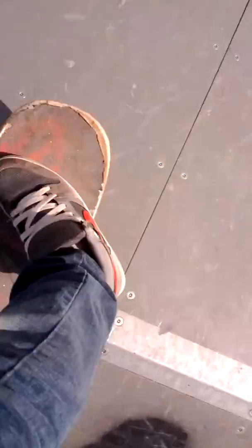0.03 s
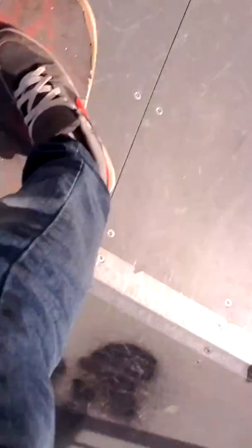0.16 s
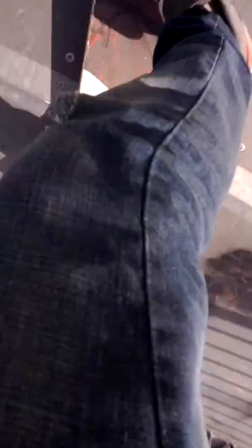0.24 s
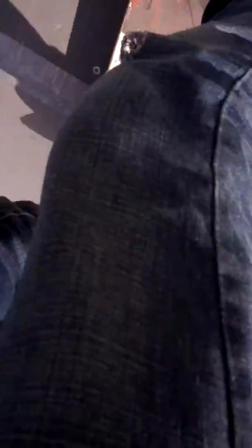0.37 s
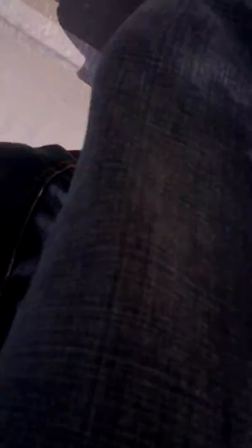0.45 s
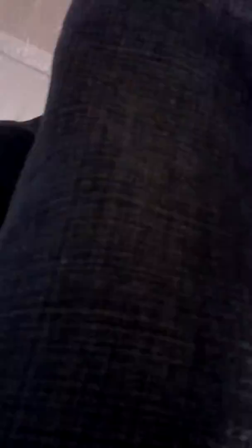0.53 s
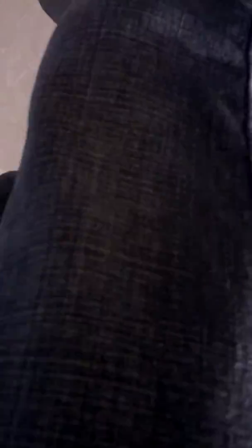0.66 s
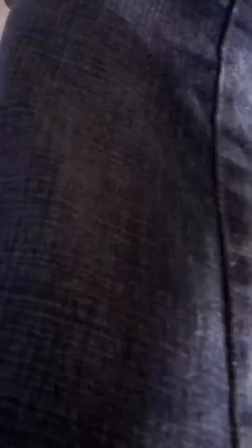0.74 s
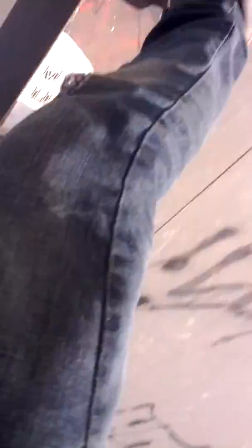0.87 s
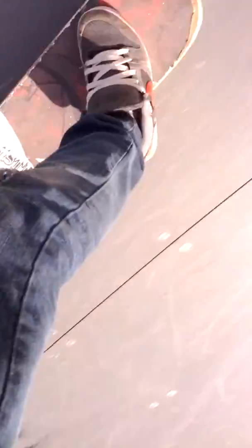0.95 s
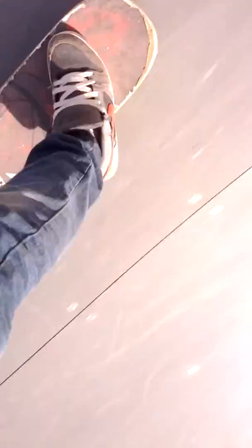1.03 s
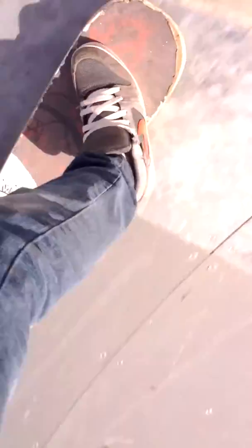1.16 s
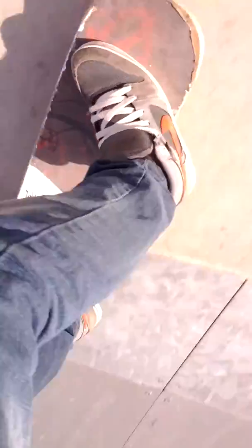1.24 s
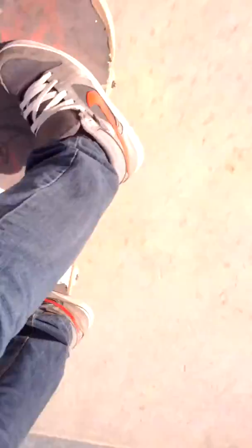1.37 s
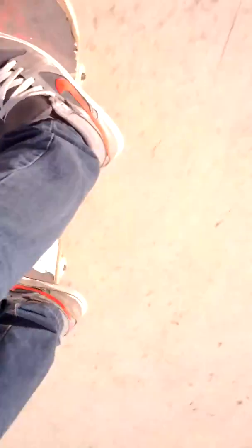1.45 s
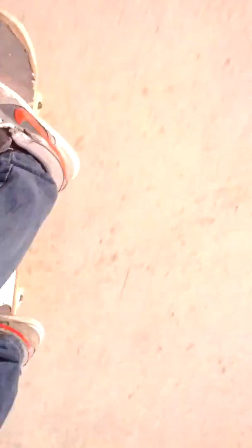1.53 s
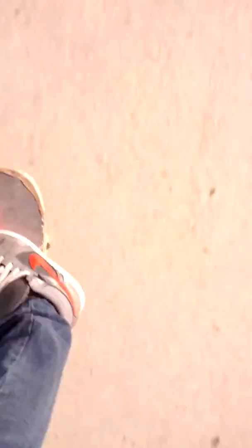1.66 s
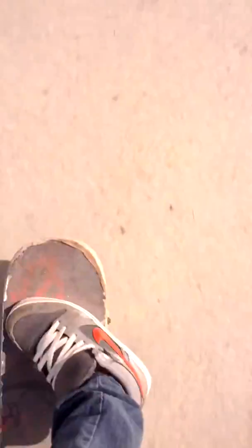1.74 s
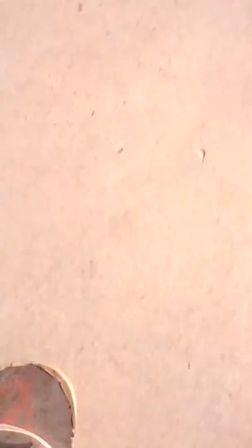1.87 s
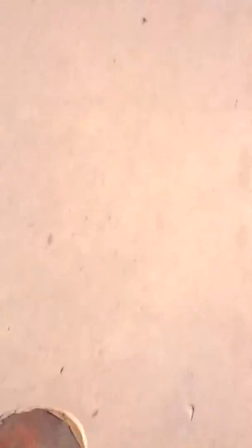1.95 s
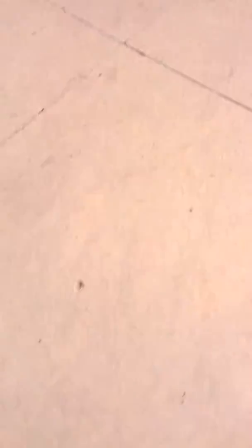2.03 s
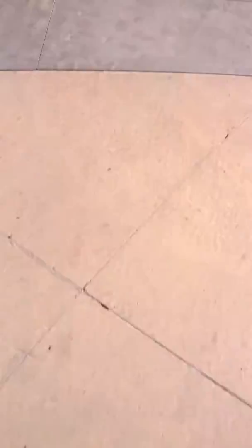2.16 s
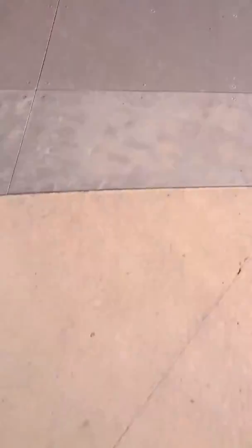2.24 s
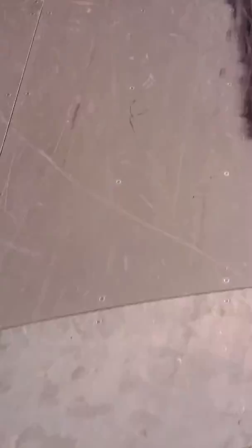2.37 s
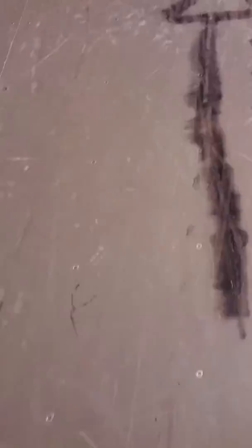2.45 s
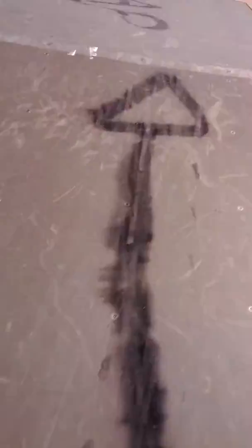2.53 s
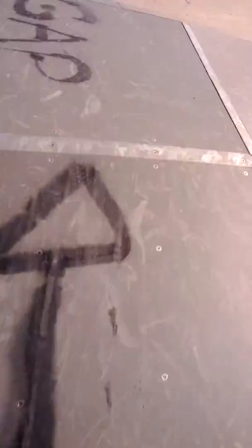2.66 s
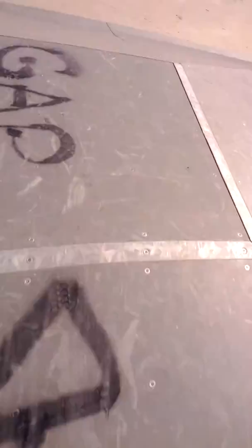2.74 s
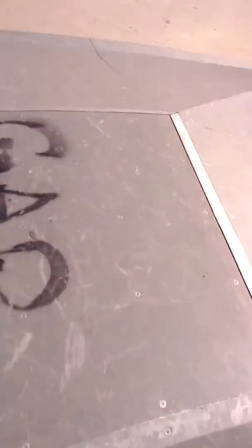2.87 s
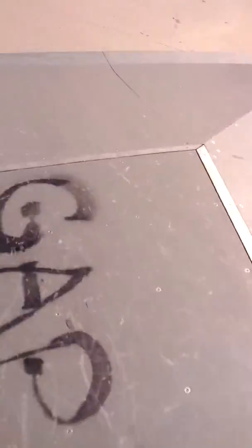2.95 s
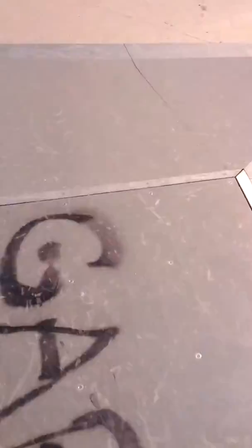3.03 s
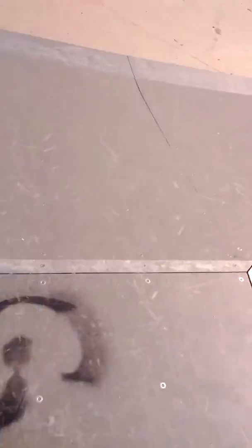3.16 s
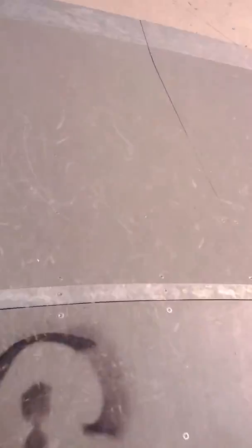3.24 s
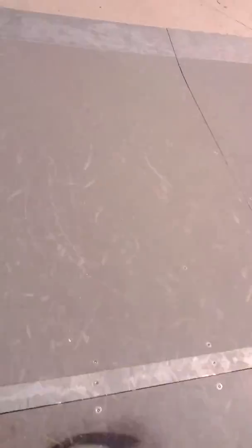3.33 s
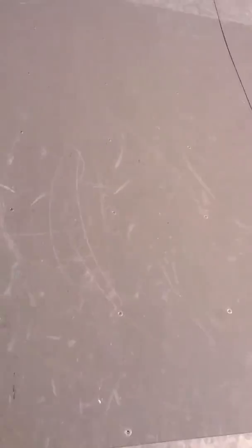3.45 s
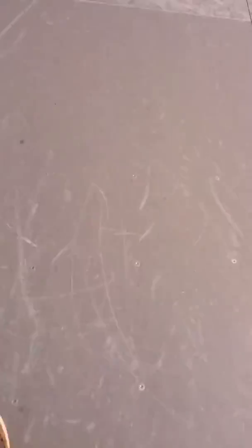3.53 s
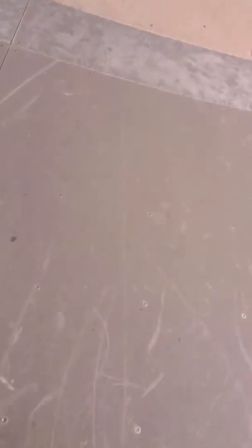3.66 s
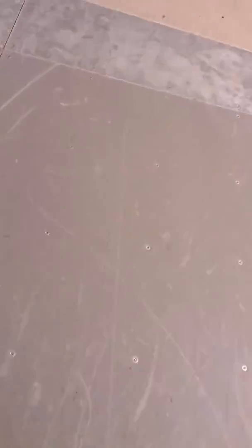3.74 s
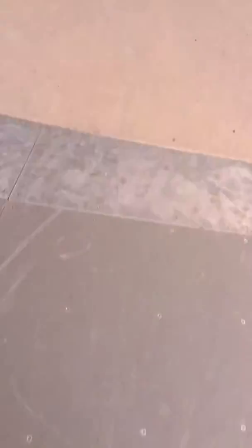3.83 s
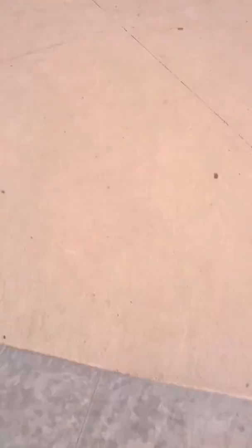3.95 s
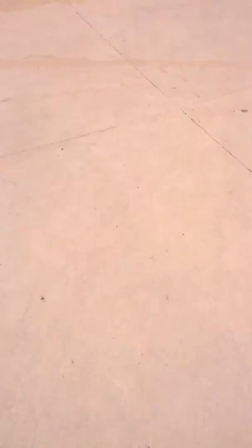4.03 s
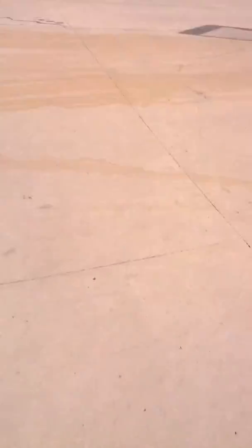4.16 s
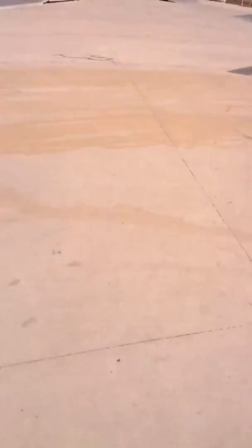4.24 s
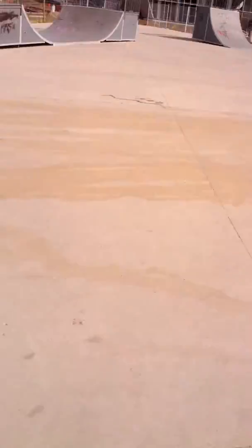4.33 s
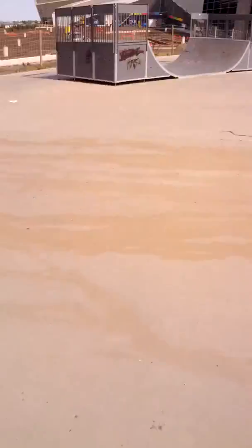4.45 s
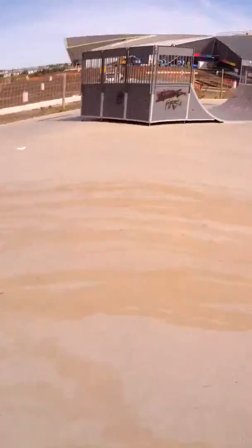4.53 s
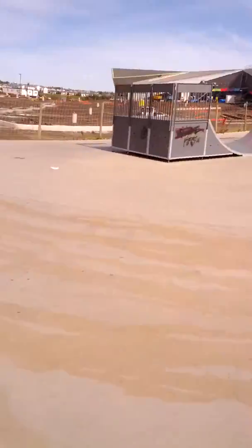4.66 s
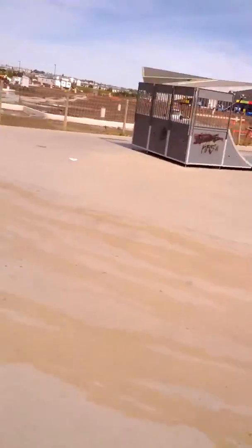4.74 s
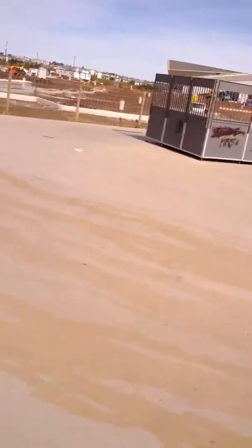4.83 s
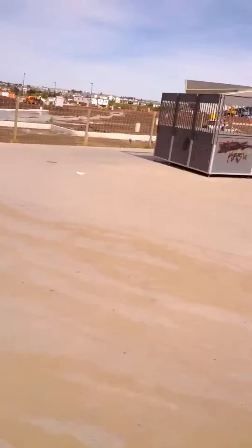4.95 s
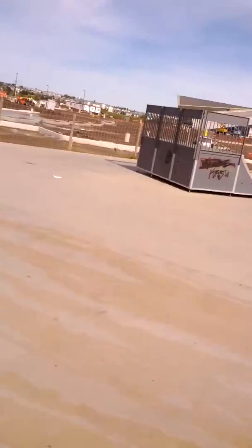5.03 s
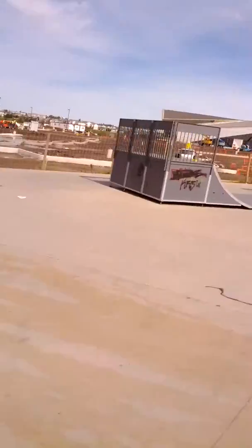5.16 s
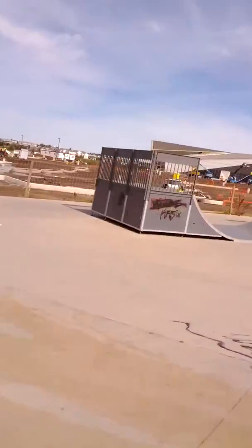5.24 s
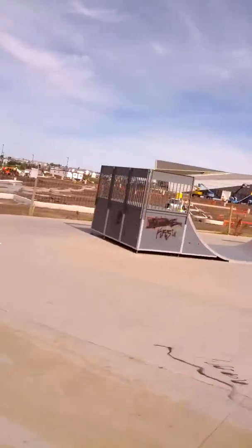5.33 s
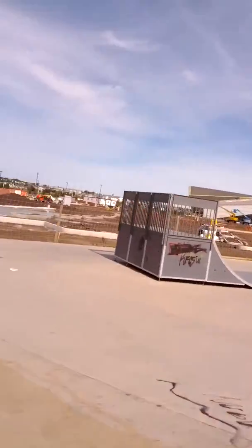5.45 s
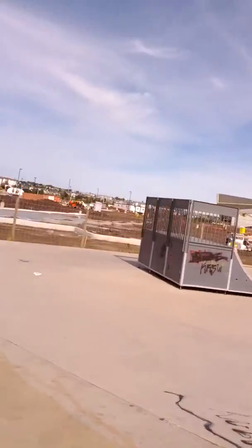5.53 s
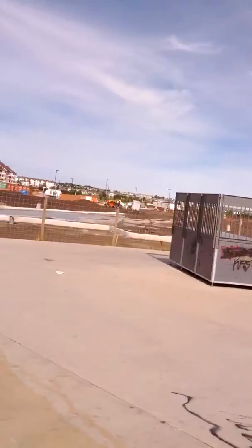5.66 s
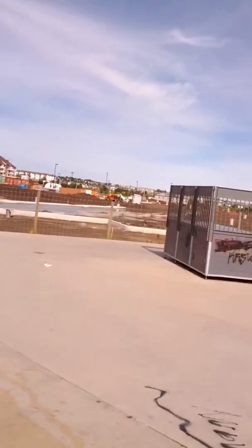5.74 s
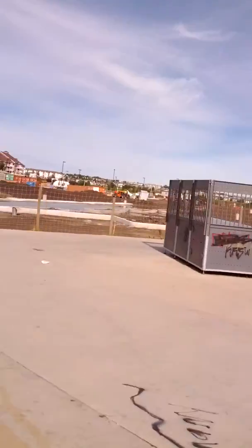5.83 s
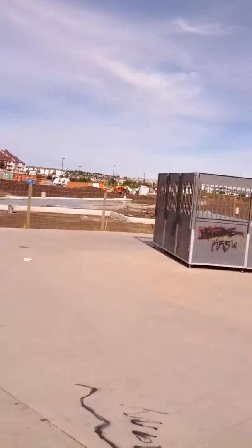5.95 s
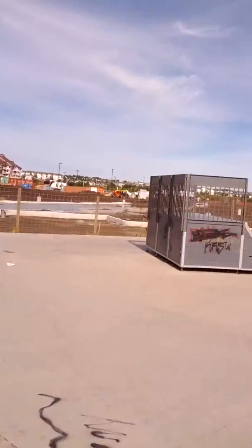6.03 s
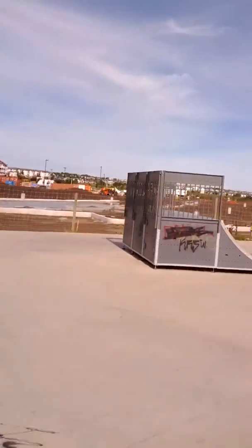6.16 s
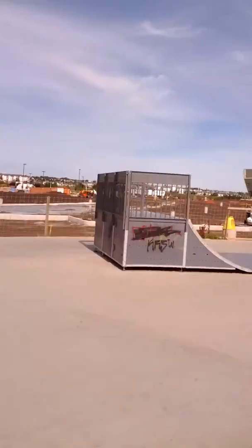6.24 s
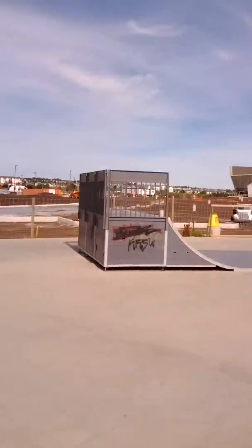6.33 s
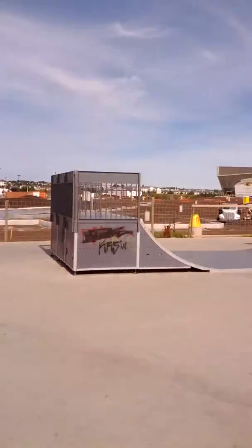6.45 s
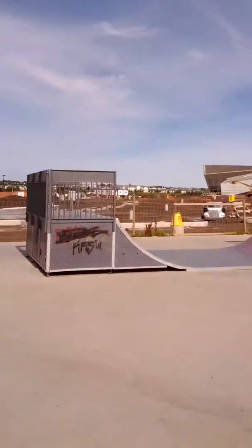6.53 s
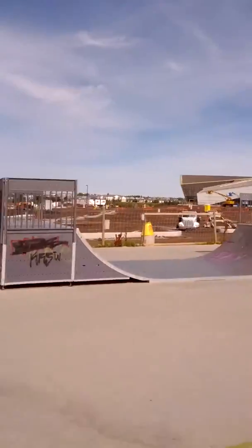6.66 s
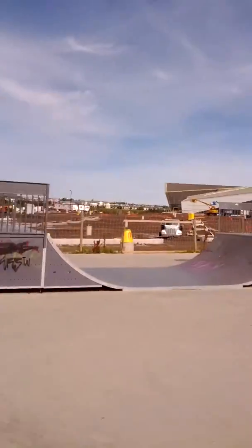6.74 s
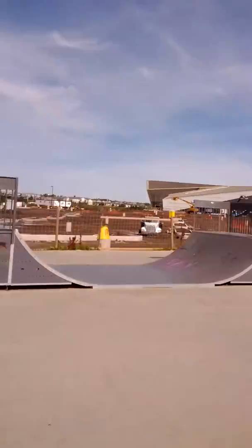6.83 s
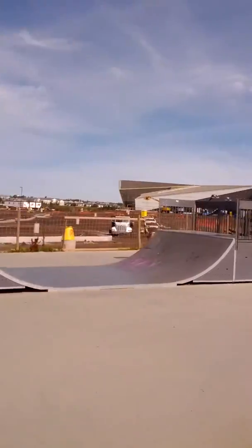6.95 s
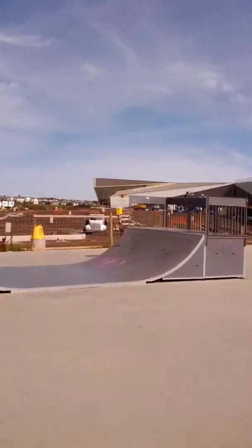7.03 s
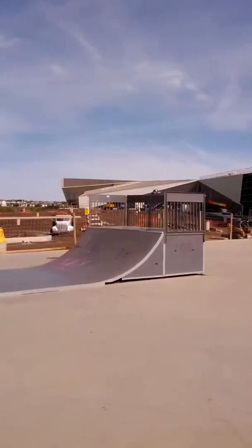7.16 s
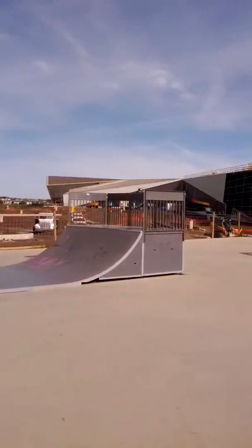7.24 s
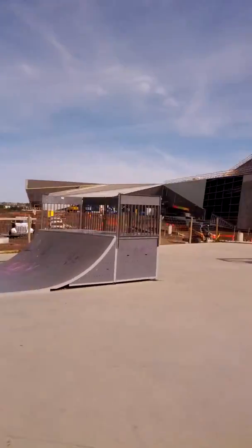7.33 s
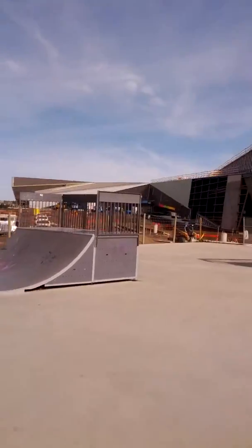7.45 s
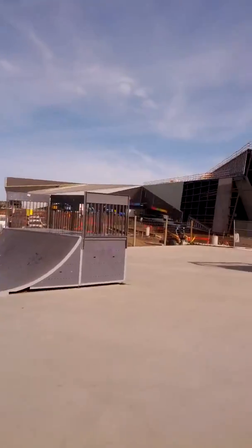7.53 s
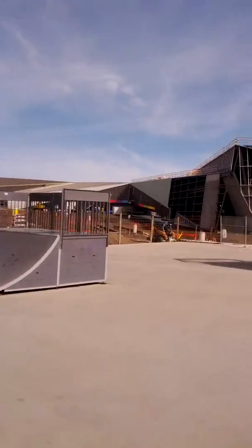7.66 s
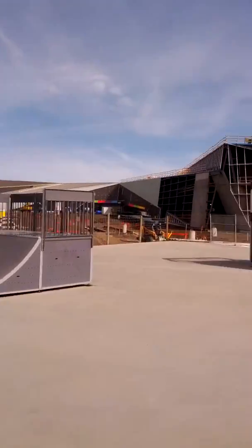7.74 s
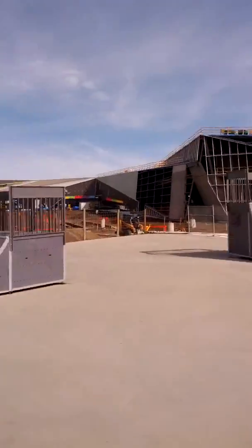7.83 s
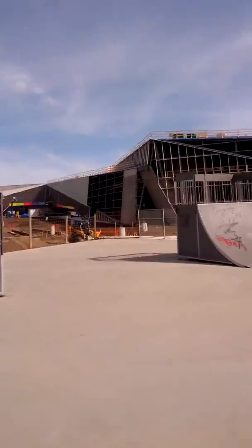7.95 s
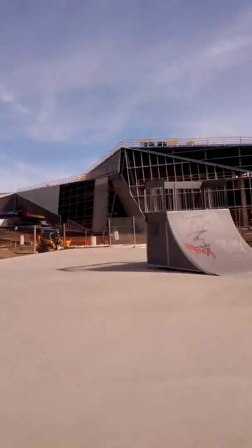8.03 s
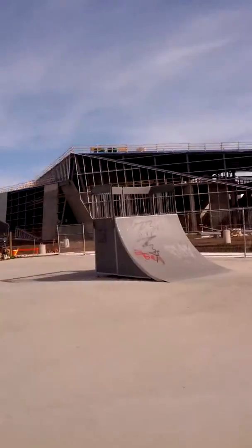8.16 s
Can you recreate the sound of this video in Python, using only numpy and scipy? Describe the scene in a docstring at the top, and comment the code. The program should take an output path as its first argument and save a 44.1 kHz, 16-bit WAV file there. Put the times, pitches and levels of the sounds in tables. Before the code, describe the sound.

A skateboard rolls outdoors, heard close from the rider's hand, with low wind rumble and gusts on the microphone throughout. At about 0.3 seconds the board creaks briefly on a ramp's lip, then its rumble builds as it gathers speed, with dull thumps of air around 0.7 seconds. From 1 to 1.3 seconds the wheels clack hard over edges, metal rattles and hollow panels boom, slightly overloading. Coarse concrete follows, with a fast, growling roll and ticking grit. Around 2.5 seconds the board clacks and booms onto a hollow box, with lighter knocks near 3 and 3.5 seconds as the rolling softens. Another cluster of clacks comes between 4.1 and 4.4 seconds. The board then coasts on smooth concrete with a steady rumble, slowing slightly, crosses one last seam with a double clack at 6.5 seconds and rolls on until about 8 seconds.

```python
"""A skateboard ride heard from the rider's hand, with wind buffeting the microphone throughout.
The board creaks over the lip of a ramp and gathers speed, ground grain shaking wheels and deck.
At the foot the wheels clack over edges, the trucks rattle and the panels boom; the hardest peaks overload.
Coarse concrete follows, with ticking grit and growling ripples, then a hollow box that clacks and booms.
The board coasts away on smooth concrete, over one last seam."""
import sys
import numpy as np
from scipy import signal
from scipy.fft import rfft, irfft, next_fast_len
from scipy.io import wavfile
from scipy.ndimage import uniform_filter1d

SR = 44100
rng = np.random.default_rng(int(sys.argv[2]) if len(sys.argv) > 2 else 0)


def to_wav(s):
    """Save 16-bit WAV."""
    ch = np.atleast_2d(s).T  # columns
    pcm = np.round(np.clip(ch, -1, 1) * 32767)  # PCM
    wavfile.write(sys.argv[1], SR, pcm.astype(np.int16))


N = 361179
TIME_S = np.arange(N) / SR


def amp(db):
    """Decibels to gain."""
    return 10 ** (np.asarray(db) / 20)


def unit(x):
    """Scale to rms 1."""
    return x / np.sqrt(np.mean(x ** 2) + 1e-20)


def curves(rows):
    """Each column of a timed table, per sample."""
    time_s, *columns = np.transpose(rows)
    return [np.interp(TIME_S, time_s, column) for column in columns]


def swell(centre_s, half_s):
    """Gaussian rise and fall of height 1."""
    return np.exp(-((TIME_S - centre_s) / half_s) ** 2)


def add(mix, start_s, sound):
    """Mix a sound in at start_s."""
    part = mix[max(round(start_s * SR), 0):][:len(sound)]
    part += sound[:len(part)]


def bells_db(hz, resonances):
    """Summed lift of bell-shaped peaks and dips."""
    return sum(lift / (1 + (2 * (hz - centre) / width) ** 2) for centre, width, lift in resonances)


def colour(x, spectrum, resonances=()):
    """Filter by a smooth spectrum plus resonances; rms 1."""
    size = next_fast_len(len(x))
    hz = np.fft.rfftfreq(size, 1 / SR)
    freq_hz, level_db = np.transpose(spectrum)
    shape_db = np.interp(np.log(hz + 1), np.log(freq_hz + 1), level_db) + bells_db(hz, resonances)
    return unit(irfft(rfft(x, size) * amp(shape_db), size)[:len(x)])


def noise(samples, spectrum, resonances=()):
    """Coloured noise; rms 1."""
    return colour(rng.standard_normal(samples), spectrum, resonances)


def band(x, low_hz, high_hz):
    """Band-pass; rms 1."""
    return unit(signal.sosfilt(signal.butter(4, [low_hz, high_hz], "band", fs=SR, output="sos"), x))


def flutter(per_s):
    """Smooth random drift; rms 1."""
    return unit(np.interp(TIME_S * per_s, np.arange(N), rng.standard_normal(N)))


def bumps(per_s, spread_db):
    """Sparse pushes of uneven size and either sign; rms 1."""
    size = amp(spread_db * np.minimum(rng.exponential(1, N), 4))
    return unit(size * rng.standard_normal(N) * (rng.random(N) < per_s / SR))


# board speed: time_s, speed_m_per_s
SPEED = [(0, 0.67), (.2, 0.8), (.34, 1.23), (.48, 2.2), (.7, 3.03), (1.0, 4.63), (1.25, 5.7), (1.65, 6.43),
         (2.45, 4.93), (2.85, 3.8), (3.2, 3.2), (3.7, 3.13), (4.2, 3.74), (4.75, 3.64), (6.5, 3.24),
         (8.19, 2.8)]
# ramp, coarse flat, box, smooth flat; levels at cruising speed, rises per doubling of speed:
# start_s, drone_db, roar_db, hiss_db, drone_rise_db, roar_rise_db, hiss_rise_db
STRETCHES = [(0, -27, -29, -39, 8.5, 9.5, 17), (1.25, -21, -34.5, -37, 4, 14.5, 4.5),
             (2.45, -31, -31.5, -41, 9, 11.5, 24), (4.25, -28.5, -36, -46, 10.5, -4.5, 23.5)]
# rider weights or lightens the wheels: centre_s, half_length_s, drone_and_roar_db, hiss_db
RIDER_LOADS = [(0.19, 0.035, 3, 8), (0.706, 0.18, 4.5, 1), (2.115, 0.098, -2.5, 1),
               (3.097, 0.095, -8.5, -7.5), (3.346, 0.11, -0.5, 2.5), (3.607, 0.092, -5, -6),
               (5.298, .2, 1, -1.5), (6.898, 0.3, -1.5, -1)]
CRUISE_M_PER_S, AXLE_CHANGEOVER_S = 4, 0.24


def wheel_levels_db():
    """Drone, roar and hiss follow the stretch of ground, the speed and the rider's weight."""
    rows = np.array(STRETCHES)
    underfoot = rows[np.searchsorted(rows[1:, 0], TIME_S), 1:].T
    underfoot = uniform_filter1d(underfoot, round(AXLE_CHANGEOVER_S * SR), axis=1)
    cruise_db, rise_db = np.split(underfoot, 2)
    doublings = np.log2(curves(SPEED)[0] / CRUISE_M_PER_S)
    load_db = sum(np.outer([body_db, body_db, hiss_db], swell(centre_s, half_s))
                  for centre_s, half_s, body_db, hiss_db in RIDER_LOADS)
    return cruise_db + rise_db * doublings + load_db


# surface under the wheels, the rest being smooth concrete: time_s, panel_share, coarse_share
SURFACE_SHARES = [(0, 1, 0), (1.1, 0.5, 0.02), (1.27, 0.14, 0.98), (2.42, 0.2, 0.7), (2.55, 0.8, 0.55),
                  (3.7, 0.97, 0), (3.8, 0.7, 0.05), (4.15, 0.6, 0), (4.33, 0, 0.23), (4.8, 0.01, 0.07)]
# wheels on panels: freq_hz, level_db
PANEL_SPECTRUM = [(150, 4), (240, 1.5), (400, -10), (600, -1.5), (850, -7), (1500, -6.5), (2050, -12),
                  (3300, -21.5), (4800, -33), (6000, -38.5), (16000, -31.5)]
# panel resonances: centre_hz, width_hz, lift_db
PANEL_RESONANCES = [(550, 130, 1.5), (920, 89, 6), (1090, 80, -4.5), (1202, 190, 11), (1350, 78, -6),
                    (1513, 120, 7), (1637, 59, 5.5), (2640, 290, 4.5), (2970, 200, -5), (3330, 200, 0.5),
                    (4330, 500, 0), (5030, 440, 1.5), (15000, 900, -1)]
# wheels on coarse concrete: freq_hz, level_db
COARSE_SPECTRUM = [(150, -3), (330, -1.5), (560, -2.5), (800, -7), (1100, -8.5), (1500, -11), (1900, -14.5),
                   (3400, -22), (4300, -28), (7000, -32), (16000, -31.5)]
# deck and wheels driven hard: centre_hz, width_hz, lift_db
COARSE_RESONANCES = [(333, 70, 5.5), (512, 57, 7.5), (937, 96, 7.5), (1160, 80, -9.5), (1210, 45, -4),
                     (1276, 93, -9.5), (1455, 74, 9.5), (2040, 81, 1.5), (2650, 130, 4), (3330, 360, 2),
                     (5700, 400, 1.5)]
# wheels on smooth concrete: freq_hz, level_db
SMOOTH_SPECTRUM = [(150, 5), (310, 3.5), (410, -0.5), (620, 3), (930, -10), (1300, -5.5), (1700, -11),
                   (2000, -22), (3200, -30), (4700, -37), (5500, -44), (8000, -42), (16000, -48)]
# deck and wheels coasting, and two dips in the treble from the microphone port: centre_hz, width_hz, lift_db
SMOOTH_RESONANCES = [(290, 60, 3.5), (404, 22, -5), (530, 64, 5), (703, 130, 6.5), (920, 79, -23.5),
                     (1360, 160, 2), (1495, 52, -15.5), (1660, 84, 6), (1990, 200, -4), (2436, 180, 8.5),
                     (2880, 200, 2), (4650, 310, 3.5), (8200, 700, -12.5), (12800, 1200, -12)]


def rolling(drone_db, roar_db, hiss_db):
    """Ground grain shakes wheels and deck; each surface has its own colour."""
    panel, coarse = np.clip(curves(SURFACE_SHARES), 0, 1)
    smooth = np.clip(1 - panel - coarse, 0, 1)
    force = rng.standard_normal(N) + 0.48 * bumps(per_s=1800, spread_db=2.5)
    force *= amp(0.5 * flutter(per_s=40))  # rougher patches
    drone_flicker_db = (1 + coarse) * flutter(per_s=54)
    out = np.zeros(N)
    for share, spectrum, resonances in [(panel, PANEL_SPECTRUM, PANEL_RESONANCES),
                                        (coarse, COARSE_SPECTRUM, COARSE_RESONANCES),
                                        (smooth, SMOOTH_SPECTRUM, SMOOTH_RESONANCES)]:
        wheels = colour(force, spectrum, resonances)
        drone = amp(drone_db + drone_flicker_db) * band(wheels, low_hz=250, high_hz=888)
        roar = amp(roar_db) * band(wheels, low_hz=1004, high_hz=4160)
        hiss = amp(hiss_db) * band(wheels, low_hz=4700, high_hz=18500)
        out += np.sqrt(share) * (drone + roar + hiss)
    return out / (np.sqrt(panel) + np.sqrt(coarse) + np.sqrt(smooth))


# snap of grit: freq_hz, level_db
GRIT_SPECTRUM = [(1000, -40), (3000, -41), (5000, 4.5), (8000, 0.5), (12000, 2.5), (16000, 4)]


def grit(hiss_db, decay_s=0.00075):
    """Sand grains crack under the wheels, most on coarse concrete."""
    coarse = np.clip(curves(SURFACE_SHARES)[1], 0, 1)
    t = np.arange(SR // 100) / SR
    grains = abs(bumps(per_s=40, spread_db=-1.0))
    envelope = signal.oaconvolve(grains, np.exp(-t / decay_s))[:N]
    return amp(hiss_db - 10.5 + 8.2 * coarse) * unit(envelope * noise(N, GRIT_SPECTRUM))


# steady air on the microphone: time_s, rumble_db, buffet_db
BREEZE = [(0, -40, -60), (.45, -33.5, -39), (1.2, -23, -29.5), (2.15, -40, -34.5), (3.2, -32.5, -38.5),
          (3.65, -35, -39.5), (4.4, -31, -31), (5.2, -30.5, -36), (6.7, -34, -40.5), (7.4, -34, -39),
          (8.19, -36, -34.5)]
# gusts: centre_s, half_length_s, rumble_db, buffet_db
GUSTS = [(0.062, 0.018, -27, -36.5), (0.78, 0.12, -19, -18.5), (0.937, 0.067, -22, -16.5),
         (1.133, 0.085, -33, -13.5), (1.24, 0.066, -20, -18), (1.92, 0.081, -34, -22),
         (2.536, 0.1, -28, -20.5), (2.91, 0.14, -34, -36), (3.89, 0.15, -29.5, -37),
         (4.17, 0.11, -33, -24.5), (5.77, 0.23, -27, -34), (6.303, 0.12, -28, -30),
         (7.13, 0.056, -25.5, -32.5), (7.932, 0.047, -28, -32)]
# deep wind rumble: freq_hz, level_db
RUMBLE_SPECTRUM = [(10, -23), (25, -0.5), (55, 1), (100, -3.5), (170, -12), (400, -53), (1500, -90)]
# wind buffeting: freq_hz, level_db
BUFFET_SPECTRUM = [(30, -12), (80, -3.5), (130, -1.5), (220, 0.5), (330, -8), (700, -21), (2500, -59)]


def wind():
    """Low turbulence at the microphone; breeze and gusts add in power."""
    rumble_power, buffet_power = amp(curves(BREEZE) + 1.9 * flutter(per_s=7)) ** 2
    for centre_s, half_s, rumble_db, buffet_db in GUSTS:
        gust = swell(centre_s, half_s)
        rumble_power += (amp(rumble_db) * gust) ** 2
        buffet_power += (amp(buffet_db) * gust) ** 2
    rumble = np.sqrt(rumble_power) * noise(N, RUMBLE_SPECTRUM)
    buffet = np.sqrt(buffet_power) * amp(2.1 * flutter(per_s=40)) * noise(N, BUFFET_SPECTRUM)
    return rumble + buffet


# dull thumps of air: centre_s, peak_db, centre_to_peak_s
AIR_THUMPS = [(0.056, -32, 0.0023), (0.658, -6.5, 0.00085), (0.7195, 0, 0.00084), (.727, -17, 0.0013),
              (0.755, -17, .002), (0.8, -11, 0.0028), (.816, -4.5, 0.00048), (7.155, -15, .002)]


def air_thumps():
    """Single pressure swings at the microphone, down then up."""
    out = np.zeros(N)
    for centre_s, peak_db, to_peak_s in AIR_THUMPS:
        u = np.arange(-4 * to_peak_s, 4 * to_peak_s, 1 / SR) / to_peak_s
        add(out, centre_s - 4 * to_peak_s, amp(peak_db) * u * np.exp((1 - u ** 2) / 2))
    return out


# creaks on the lip: start_s, level_db
CREAKS = [(0.309, -18), (.317, -37), (.336, -27), (0.362, -31), (0.377, -26), (0.388, -22), (.401, -32)]
# board creak: freq_hz, level_db
CREAK_SPECTRUM = [(300, -5), (1300, 9), (2500, -1), (5000, -3.5), (7500, -8), (10000, -10), (16000, -2)]


def creaks(gain_db=-6.5, attack_s=0.00064, t60_s=0.021):
    """The board creaks against the lip of the ramp as it tips in."""
    out, t = np.zeros(N), np.arange(SR // 12) / SR
    envelope = amp(gain_db - 60 * t / t60_s) * (1 - np.exp(-t / attack_s))
    for start_s, level_db in CREAKS:
        add(out, start_s, amp(level_db) * envelope * noise(len(t), CREAK_SPECTRUM))
    return out


def blows(gap_s, fall_db):
    """Delay_s and level_db as an axle's wheels land and rebound; each blow loses more than the last."""
    return [(k * gap_s, -fall_db * k ** 1.56) for k in range(3)]


# axles meet seams and steel edge plates; the rows at 1.555 s and 1.970 s are wheels striking pebbles: start_s,
# ring_db, pitch_hz, crack_re_ring_db, blow_gap_s, blow_fall_db, chatter_db, chatter_lag_s
AXLE_HITS = [(1.015, 2, 480, -20.5, .004, 9, -33, 0.0049), (1.0666, 7, 548, -13.5, 0.02, 6.5, -15.5, 0.019),
             (1.12, 12, 556, -11, .0125, 8, -0.5, 0.0044), (1.1752, 6, 747, -1, 0.015, 4, -5, 0.012),
             (1.2504, 14.5, 930, -11.5, 0.01, 15, -11, 0), (1.5554, -7, 614, -4, 0.015, 2.5, -22, 0.0095),
             (1.9696, -6, 705, -23, 0.013, 8, -14.5, 0.00066), (2.4242, 11, 570, -15, .031, 16.5, -0.5, 0),
             (2.496, -3.5, 765, -29, .005, 20, -17, 0.0012), (2.509, -0.5, 620, -4, 0.024, 12, -.5, 0.0006),
             (2.576, -3.5, 780, -14, 0.00555, 9, -22.5, 0.015), (2.9412, -9, 506, -9.5, 0.0047, 20, -25, 0),
             (2.969, -5.5, 890, -7, .0045, 11, -18.5, 0.00035), (3.124, -20.5, 300, -4, 0.0076, 15, -37, 0),
             (3.162, -17.5, 336, -4, 0.0091, 3.5, -27, 0), (3.475, -19, 690, 0.5, .0225, 4, -32, 0.017),
             (3.691, -19.5, 796, -3, .008, 4, -26, 0), (3.705, -9.5, 714, -3.5, .016, 3, -25, 0),
             (4.126, -9.5, 643, -19, 0.0038, 1.5, -29, 0.0083),
             (4.134, 3, 578, -19.5, 0.0086, 5, -18.5, .015),
             (4.212, 4.5, 630, -14.5, 0.0095, 2, -19, 0.027),
             (4.306, -3.5, 737, -4, 0.0076, 5.5, -25, 0.0074),
             (4.398, -12, 613, -26, .006, 15, -37, 0.0052), (6.496, 5, 630, -20, 0.011, 4.5, -40, 0),
             (6.623, 1.5, 690, -10.5, 0.011, 6.5, -36, 0.015)]
# wheel and deck modes: pitch_ratio, level_db, t60_factor
CLACK_MODES = [(.3, -18, 2.2), (.52, -10, 1.02), (.83, -7, 0.57), (0.999, -2, 0.78), (1.42, -14, 0.61),
               (1.98, -18, 0.61), (3.4, -26, 0.79), (4., -30, 0.48)]
# impact crack: freq_hz, level_db
CRACK_SPECTRUM = [(100, -10.5), (400, 8.5), (1200, 1.5), (2800, -13), (5000, -17), (9000, -22.5),
                  (16000, -27)]


def clacks(attack_s=0.00073, hold_s=0.0015, ring_t60_s=0.025, crack_t60_s=0.036):
    """Each blow rings wheel and deck for a few cycles, under a short crack."""
    out, t = np.zeros(N), np.arange(SR // 6) / SR
    free_s = np.maximum(t - hold_s, 0)  # the soft wheel keeps pushing before the ring dies
    attack = 1 - np.exp(-t / attack_s)
    for start_s, ring_db, pitch_hz, crack_db, gap_s, fall_db, _, _ in AXLE_HITS:
        ring = np.zeros(len(t))
        for ratio, mode_db, t60_factor in CLACK_MODES:
            decay = amp(mode_db - 60 * free_s / (ring_t60_s * t60_factor))
            ring += decay * np.sin(2 * np.pi * pitch_hz * ratio * t)
        for delay_s, blow_db in blows(gap_s, fall_db):
            crack = noise(len(t), CRACK_SPECTRUM) * amp(crack_db - 60 * free_s / crack_t60_s)
            add(out, start_s + delay_s, amp(ring_db + blow_db) * (ring + crack) * attack)
    return out


# steel chatter: freq_hz, level_db
STEEL_SPECTRUM = [(500, -58), (2000, 2), (4000, 0), (7000, 0.5), (11000, 4), (15500, 4)]
# truck resonances: centre_hz, width_hz, lift_db
TRUCK_RESONANCES = [(2970, 100, 6), (4210, 250, 3.5), (8460, 150, 10), (13900, 1700, 4)]


def truck_rattle(attack_s=0.0014, t60_s=0.059):
    """Loose metal chatters after each blow; the bright bursts add in power."""
    power, t = np.zeros(N), np.arange(SR // 6) / SR
    chatter = unit(noise(N, STEEL_SPECTRUM, TRUCK_RESONANCES) * amp(3.7 * flutter(per_s=830)))
    burst = amp(-60 * t / t60_s) * (1 - np.exp(-t / attack_s))
    for start_s, _, _, _, gap_s, fall_db, chatter_db, lag_s in AXLE_HITS:
        for delay_s, blow_db in blows(gap_s, fall_db):
            add(power, start_s + lag_s + delay_s, (amp(chatter_db + blow_db) * burst) ** 2)
    return np.sqrt(power) * chatter


# landings on hollow panels: start_s, level_db, pitch_hz, t60_s
PANEL_BOOMS = [(1.1, -5.5, 138, 0.3), (1.134, -12, 171, 0.29), (2.57, -24, 60.6, 0.26),
               (2.601, -21, 115, 0.35), (2.972, -15.5, 117.5, 0.28), (3.126, -33, 83, 0.12),
               (3.491, -9, 119, 0.1)]


def panel_booms(attack_s=0.0074):
    """Ramp and box panels swing slowly under the board's weight."""
    out, t = np.zeros(N), np.arange(SR // 2) / SR
    for start_s, level_db, pitch_hz, t60_s in PANEL_BOOMS:
        envelope = amp(level_db - 60 * t / t60_s) * (1 - np.exp(-t / attack_s))
        add(out, start_s, envelope * np.sin(2 * np.pi * pitch_hz * t))
    return out


# rippled concrete: centre_s, half_length_s, level_db
RIPPLES = [(1.892, 0.081, -16), (2.265, 0.022, -16), (2.374, .04, -17), (4.4, 0.2, -23),
           (5.784, 0.08, -29.5), (6.465, 0.03, -30)]


def ripple_growl(centre_hz=575, width_hz=190):
    """Ripples keep the main wheel resonance ringing."""
    hz = np.fft.rfftfreq(N, 1 / SR)
    resonance = (1 + (2 * (hz - centre_hz) / width_hz) ** 2) ** -1.1
    ring = unit(irfft(rfft(rng.standard_normal(N)) * resonance, N))
    return ring * sum(amp(level_db) * swell(centre_s, half_s) for centre_s, half_s, level_db in RIPPLES)


# ticks of grit or hardware: start_s, level_db
TICKS = [(2.0865, -12), (2.2019, -14), (2.2398, -15), (2.4434, -5), (2.5384, -8), (3.2568, -15.5),
         (3.6895, -15), (4.4944, -10), (5.013, -34), (5.2415, -38)]


def ticks(snap_t60_s=0.0062, tail_t60_s=0.039, tail_db=-24):
    """Grit or hardware snaps once, with a faint tail."""
    out, t = np.zeros(N), np.arange(SR // 6) / SR
    envelope = amp(-60 * t / snap_t60_s) + amp(tail_db - 60 * t / tail_t60_s)
    for start_s, level_db in TICKS:
        add(out, start_s, amp(level_db) * envelope * noise(len(t), GRIT_SPECTRUM))
    return out


def scatter(x, t60_s, wet_db, predelay_s=0.005, tap_share=0.05):
    """Ground, rider and ramps throw back a short, thin tail."""
    t = np.arange(SR // 3) / SR
    taps = rng.standard_normal(len(t)) * (rng.random(len(t)) < tap_share)
    taps *= (t > predelay_s) * amp(-60 * t / t60_s)
    return x + amp(wet_db) * signal.fftconvolve(x, taps / np.linalg.norm(taps))[:N]


def scene():
    """Board, panels and wind at one microphone, over its steady hiss."""
    drone_db, roar_db, hiss_db = wheel_levels_db()
    hits = scatter(clacks() + truck_rattle() + ticks() + creaks(), t60_s=0.1, wet_db=-16.5)
    wheels = rolling(drone_db, roar_db, hiss_db) + ripple_growl() + grit(hiss_db)
    air = wind() + air_thumps()
    microphone_hiss = amp(-58.5) * rng.standard_normal(N)
    return (wheels + air + panel_booms() + hits + microphone_hiss)[None]


# microphone port resonances: centre_hz, width_hz, lift_db
PORT_RESONANCES = [(7650, 800, 1), (8280, 3200, -1.5), (11200, 1400, 2.5), (12940, 9400, -4.5),
                   (15400, 1100, 2)]
OVERLOAD_LEVEL, BAND_LIMIT_HZ = 0.71, 15820


def record(dry):
    """The microphone port colours the treble, the hardest peaks flatten, a low-pass follows."""
    size = next_fast_len(N)
    port_gain = amp(bells_db(np.fft.rfftfreq(size, 1 / SR), PORT_RESONANCES))
    heard = irfft(rfft(dry, size) * port_gain, size)[:, :N]
    clipped = heard / (1 + (heard / OVERLOAD_LEVEL) ** 8) ** (1 / 8)
    low_pass = signal.firwin(511, BAND_LIMIT_HZ, window=("kaiser", 9), fs=SR)
    return signal.oaconvolve(clipped, low_pass[None], "same")


dry = scene()
out = record(dry)
to_wav(out)
```